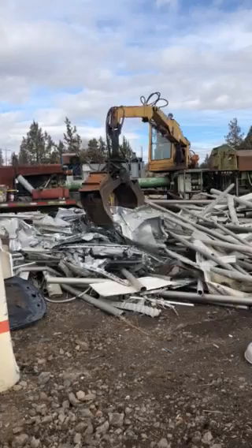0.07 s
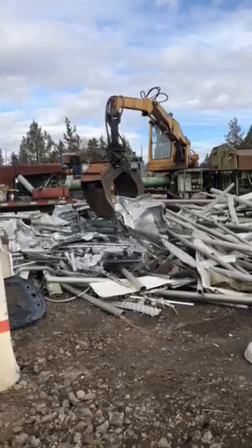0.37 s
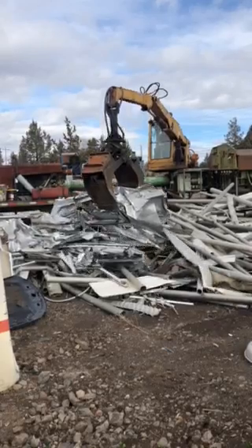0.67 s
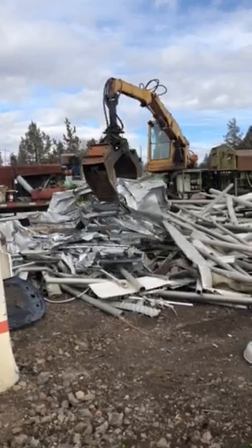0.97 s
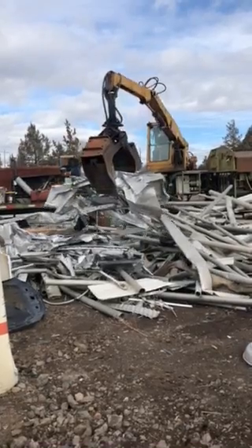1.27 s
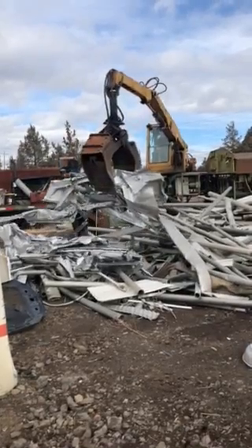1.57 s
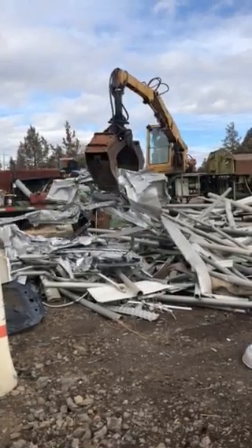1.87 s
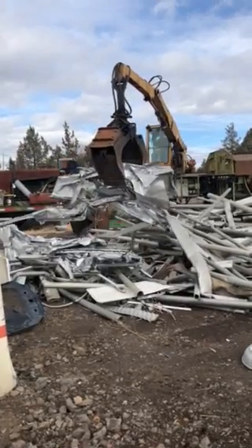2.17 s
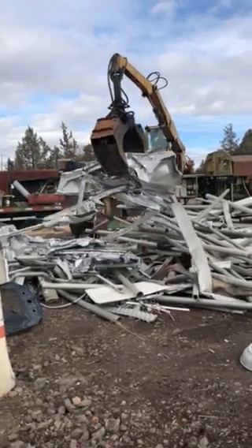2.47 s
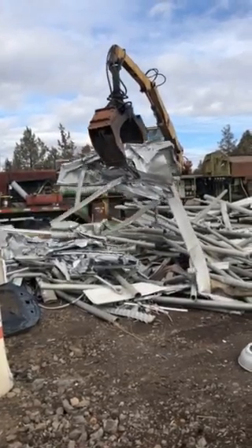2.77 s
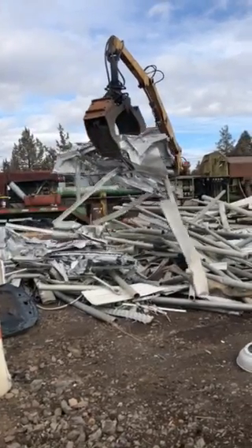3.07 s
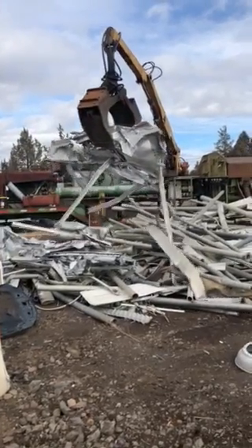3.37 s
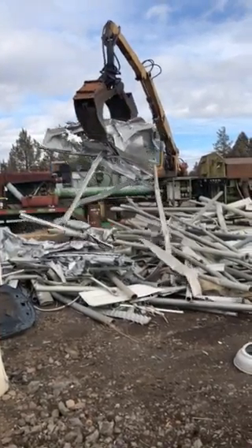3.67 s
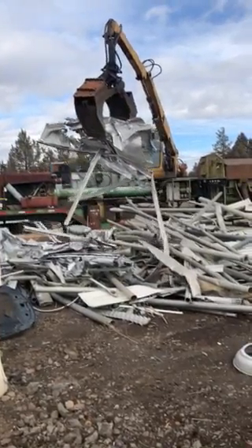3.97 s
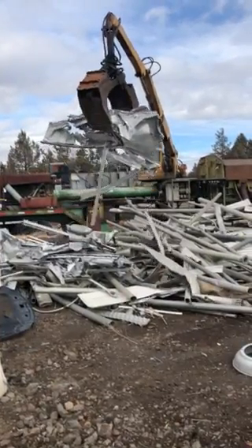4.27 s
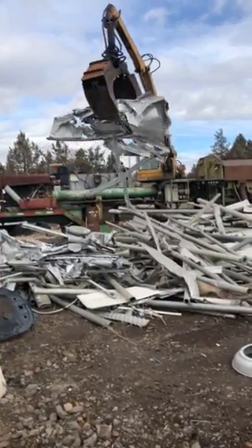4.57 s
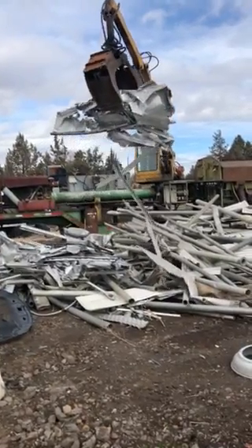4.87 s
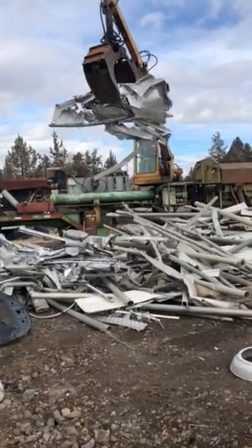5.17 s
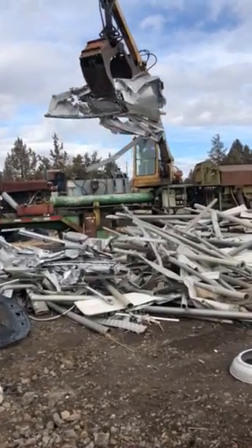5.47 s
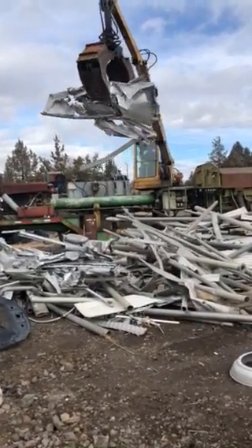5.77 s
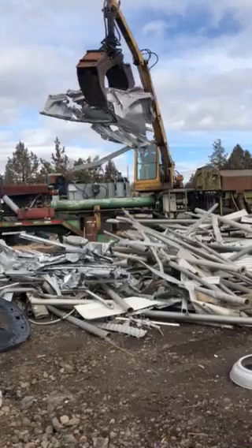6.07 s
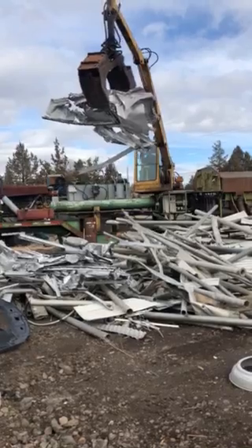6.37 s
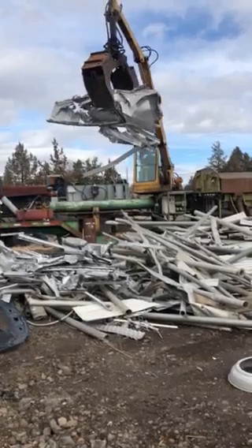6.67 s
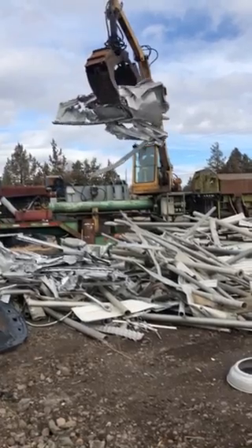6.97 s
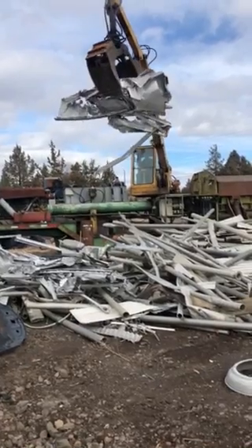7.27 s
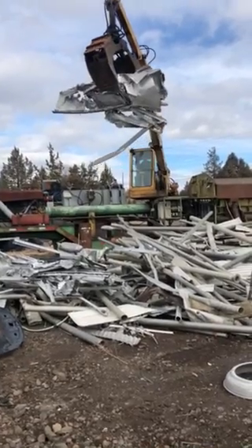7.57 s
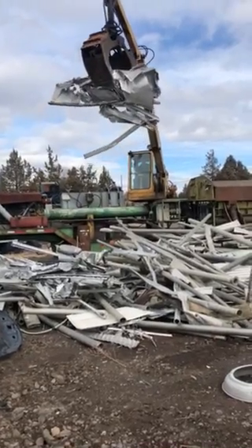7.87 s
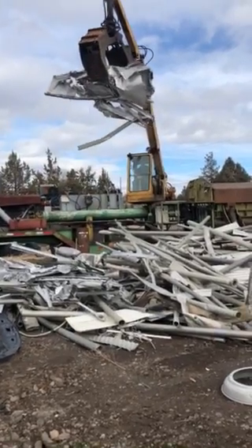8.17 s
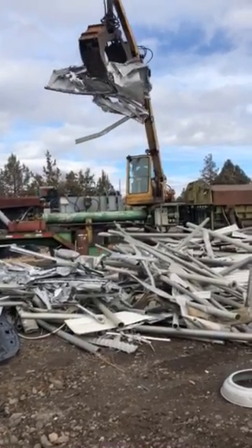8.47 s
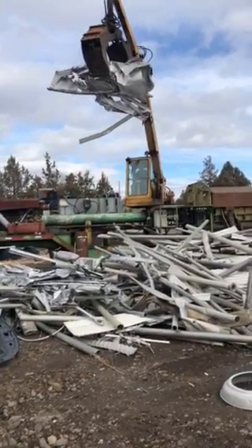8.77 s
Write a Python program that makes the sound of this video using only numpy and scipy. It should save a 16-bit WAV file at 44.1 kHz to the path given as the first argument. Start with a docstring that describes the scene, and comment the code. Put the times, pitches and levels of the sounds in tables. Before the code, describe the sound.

A diesel scrap handler runs throughout with a steady knocking drone and a rush of fan noise, heard through one microphone across an open yard. From the start, aluminium sheet and tubing is dragged off a pile in quick, uneven lurches. The sheets scrape, crinkle and boom as they flex, tubes clang with a short ring, and loose pieces rattle and thud as they land. At about 0.6 seconds an edge gives a brief, rough, falling squeal. Parts snap free at around 1.2 seconds and, most sharply, at 1.4. The scraping eases near 2 seconds, then the clatter returns thickly from 2.3 seconds, with more snaps and clangs near 3.4, 4.2 and 5.2. By about 5.5 seconds the metal noise dies away. The engine continues to the end near 9 seconds, slightly louder and working harder, with one faint rattle at around 7 seconds.

```python
"""An open scrap yard, one microphone across the yard from a diesel scrap handler.
The six-cylinder engine knocks and drones throughout, working harder as the boom rises.
The machine lifts a tangle of aluminium sheet and tubing off a pile: sheets scrape, boom and crinkle,
tubes clang, pieces snap loose and land, and one edge squeals through the jaws.
After five and a half seconds the load hangs free; one faint rattle follows over the engine."""
import sys
import numpy as np
from scipy import signal
from scipy.fft import rfft, irfft, next_fast_len
from scipy.io import wavfile
from scipy.ndimage import uniform_filter1d, minimum_filter1d

SR = 44100
rng = np.random.default_rng(int(sys.argv[2]) if len(sys.argv) > 2 else 0)


def log_audio(samples):
    """Write samples as a 16-bit WAV file to the path given in sys.argv[1]."""
    # one column per channel
    frames = np.atleast_2d(samples).T
    # limit to full scale, then quantise
    limited = np.clip(frames, -1, 1)
    pcm = np.round(limited * 32767).astype(np.int16)
    wavfile.write(sys.argv[1], SR, pcm)


N = 393372
TIME = np.arange(N) / SR
RING_TIME = TIME[:SR // 2]

# engine speed: t/s, crank rotation/Hz
CRANK_SPEED = [(0.0, 24.556), (0.5, 24.499), (1.0, 24.704), (1.6, 24.777), (2.2, 24.655), (3.3, 24.947),
               (4.3, 24.74), (5.0, 24.973), (6.0, 25.006), (6.5, 24.954), (7.1, 25.142), (7.6, 25.025),
               (8.3, 25.194), (8.92, 25.475)]
# how hard the engine works: t/s, knock level/dB, tone level/dB
ENGINE_LOAD = [(0, -26, -38), (1, -23.5, -43), (2.1, -30.5, -39.5), (3.1, -25, -35), (4.1, -25.5, -37),
               (5.8, -26.5, -36), (6.2, -23, -33.5), (7.2, -23, -33), (8.5, -24.5, -33.5),
               (8.92, -22.5, -35.5)]
# exhaust and gear tones: multiple of crank speed, relative level/dB
ENGINE_TONES = [(3, -0.5), (4, -15), (4.5, -9.5), (5, -11.5), (7, -10.5), (8, -15), (10, -17), (11, -13),
                (12, -19.5), (14, -14.5), (18, -13.5), (20, -10), (21, -11.5), (28, -13), (34, -4),
                (37, -7.5), (44, -5), (48.5, -7.5), (50, 1), (55, -4.5), (61, -6), (65, -0.5)]
# injector and valve knocks in one cycle of two turns: share of the cycle, level/dB, f/Hz
KNOCKS = [(.03, -0.5, 1450), (.06, -2, 1400), (.165, -5.5, 1400), (.26, -2, 1400), (.34, 2, 850),
          (.355, 2, 1450), (.40, 2, 800), (.48, 0.5, 850), (0.526, -2, 1370), (.595, -4.5, 1400),
          (.65, 0.5, 910), (.74, -3, 1250), (.86, 3, 1246), (.96, 1.5, 1050)]
# the load comes free in lurches, each a slide of metal over metal:
# t/s, length/s, scrape level/dB, sheet boom level/dB, grit level/dB, crinkle level/dB
SLIDES = [(0.074, 0.2, -20, -27, -36.5, -57), (0.228, 0.18, -18, -29.5, -35, -51),
          (0.415, 0.12, -20, -29, -42, -65), (0.618, 0.083, -17.5, -32.5, -38.5, -71),
          (0.753, 0.12, -19.5, -26.5, -39.5, -58), (0.89, 0.11, -20.5, -27, -38.5, -68),
          (1.12, 0.052, -16.5, -35, -37, -66), (1.2, 0.12, -14, -25.5, -40, -66),
          (1.362, 0.054, -19, -37, -38, -68), (1.443, 0.17, -18, -31, -39, -59),
          (1.632, 0.024, -14.5, -33, -34, -56), (1.75, .11, -24.5, -29, -52, -74),
          (1.931, 0.23, -30, -37, -63, -81), (2.261, .08, -15, -33, -35, -60),
          (2.34, 0.044, -16, -30.5, -25, -55), (2.423, 0.085, -16, -29, -27.5, -63),
          (2.516, 0.14, -21.5, -23, -45, -60), (2.626, 0.083, -18.5, -32, -34.5, -58),
          (2.748, .04, -25.5, -38, -56, -80), (2.777, 0.079, -14, -27.5, -36.5, -55),
          (2.885, .17, -19, -26.5, -44, -65), (3.157, 0.16, -18.5, -29.5, -45.5, -64),
          (3.31, 0.047, -19.5, -31, -41, -59), (3.368, 0.18, -15, -22.5, -40, -54),
          (3.568, .11, -16, -22, -41, -54), (3.749, 0.096, -15.5, -27, -38, -64),
          (3.919, 0.065, -20, -29.5, -39, -54), (4.08, 0.11, -25, -37, -56, -61),
          (4.22, 0.15, -18, -29, -42.5, -57), (4.415, 0.052, -18.5, -27, -45, -62),
          (4.628, .06, -21.5, -27.5, -48, -69), (4.723, 0.13, -31.5, -33, -57, -73),
          (4.955, 0.038, -13.5, -29, -32, -60), (5.04, 0.078, -19, -25.5, -52, -66),
          (5.179, 0.065, -13, -27, -42, -61), (5.242, 0.097, -14, -22.5, -36.5, -51),
          (5.364, 0.16, -29.5, -36, -45, -58)]
# tubes and sheets that ring on: t/s, level/dB, f/Hz, t60/s
CLANGS = [(.08, -19, 2190, 0.36), (0.081, -21, 3330, 0.22), (.28, -15, 696, 0.39), (.908, -11.5, 1433, .18),
          (1.195, -16, 1516, 0.098), (1.442, -15, 1513, 0.11), (1.65, -11.5, 1520, .09),
          (1.753, -18.5, 1500, 0.11), (1.753, -21, 2300, 0.083), (1.753, -28, 3520, .08),
          (2.429, -20, 3210, 0.43), (2.789, -15.5, 1453, .31), (2.81, -15.5, 671, .34),
          (3.389, -16.5, 1510, .2), (3.938, -14.5, 1480, 0.13), (4.216, -9.5, 1440, 0.12),
          (4.275, -15, 1493, 0.17), (4.642, -12.5, 2370, 0.068), (4.645, -23, 485, .18),
          (4.953, -12.5, 1446, .18), (5.18, -16, 1495, .15)]
# pieces coming loose and landing: t/s, rattle level/dB, thud level/dB, crack level/dB, rattle t60/s
HITS = [(0.15, -15.5, -42, -54, 0.11), (.2813, -10.5, -40, -37.5, 0.67), (0.4357, -14, -42, -32.5, .26),
        (.4594, -15, -36, -33, 0.46), (0.6316, -18.5, -44, -45, 0.96), (0.7578, -13.5, -34.5, -43, 0.45),
        (.9067, -11, -32, -40, 0.4), (0.9648, -15, -25.5, -43, 0.91), (1.1365, -15, -25, -39.5, 0.17),
        (1.1964, -8.5, -14.5, -29, .25), (1.372, -16.5, -41, -44, .25), (1.442, -8, -46, -31.5, 0.16),
        (1.4746, -15, -22.5, -55, 0.17), (1.521, -12.5, -29, -47, 0.22), (1.6524, -15.5, -27, -51, .25),
        (1.7528, -27, -25.5, -51, 0.35), (1.8964, -19.5, -26.5, -49, .3), (2.2188, -23, -25, -63, 0.33),
        (2.2572, -13.5, -13, -46, 0.24), (2.3056, -14.5, -33, -44, 0.62), (2.36, -16, -16, -33.5, 0.39),
        (2.4432, -6.5, -45, -38, 0.36), (2.6532, -16.5, -28, -50, 0.9), (2.7836, -14, -21, -40, 0.63),
        (2.973, -23.5, -19, -55.5, 0.63), (3.036, -18.5, -35, -50, .4), (3.1691, -21, -31.5, -52, .45),
        (3.261, -32, -19.5, -48, 0.098), (3.3931, -8.5, -27.5, -46, 0.29), (3.441, -28, -16.5, -50, 1),
        (3.589, -12, -39, -43, 0.61), (3.6507, -18.5, -16, -38.5, 1), (3.7597, -10, -33, -46, 0.23),
        (3.7891, -16, -40, -31, 0.16), (3.8291, -20.5, -35, -46, 0.48), (3.9232, -19.5, -40, -39.5, 0.28),
        (3.9854, -25.5, -41, -43, .28), (4.0738, -20.5, -36, -49, 0.24), (4.215, -19, -39, -36.5, 0.81),
        (4.424, -14, -28.5, -48, 0.29), (4.6387, -27.5, -21.5, -42.5, 0.64), (4.9549, -19.5, -44, -42, .5),
        (4.9734, -9.5, -39.5, -41, 0.29), (5.0429, -15.5, -31.5, -52.5, 0.4), (5.1797, -13, -28.5, -40, .3),
        (5.23, -14.5, -19, -45, 0.48), (7.052, -41, -55, -44.5, 0.13)]
# parts under tension breaking free: t/s, level/dB
BREAKS = [(1.197, -12), (1.442, -3), (1.753, -15.5), (3.388, -15.5), (4.215, -12.5), (4.953, -17),
          (5.179, -15)]
# a sheet edge sliding through the jaws: t/s, f/Hz, level/dB
SQUEAL = [(.605, 1583, -45), (.632, 1576, -9), (.654, 1549, -15.5), (.666, 1420, -20), (.70, 1409, -20.5),
          (.717, 1397, -19), (.735, 1380, -50)]

# the tone colour of each source: f/Hz, relative level/dB
BLOCK_SPECTRUM = [(60, -15.5), (120, -8), (270, -12), (400, -16), (500, -5.5), (850, -5), (1100, 0),
                  (1300, 8.5), (1650, 2), (2000, 0), (2550, -0.5), (3300, -18), (4500, -41), (12000, -71.5)]  # engine block
FAN_SPECTRUM = [(25, -37.5), (50, -11), (80, -4.5), (140, -10), (220, -10), (400, -9), (800, 1),
                (1400, -0.5), (2500, -4), (3200, -10.5), (4050, -24.5), (4400, -22.5), (6200, -28.5),
                (7800, -42.5), (9600, -41.5), (12000, -50), (15500, -47.5)]  # fan rush
SCRAP_SPECTRUM = [(200, -29.5), (400, -9), (650, 0), (1000, 0.5), (1500, 0), (2000, -2), (2600, -3.5),
                  (3400, -15.5), (4200, -34.5), (7000, -47), (14000, -85)]  # metal scraping and clattering
BOOM_SPECTRUM = [(60, -47), (120, -18), (170, 1.5), (250, 2.5), (450, -3.5), (800, -17), (1600, -62),
                 (8000, -80.5)]  # flexing sheets
GRIT_SPECTRUM = [(1500, -35), (3200, 11.5), (5000, 7), (6500, -6), (8500, -14.5), (12000, -25),
                 (15500, -31)]  # gritty top of a slide
FOIL_SPECTRUM = [(3000, -20), (6000, 0.5), (9000, 2.5), (12000, -3.5), (15500, -2)]  # thin edges buckling
THUD_SPECTRUM = [(100, -20.5), (200, -10), (450, 5.5), (750, 7.5), (1300, 4.5), (3000, -60), (10000, -73)]  # body of a blow
CRACK_SPECTRUM = [(1500, -9), (3500, -2), (5300, 5), (8000, -5), (12000, -12.5), (15500, -18)]  # bright edge of a blow
SNAP_SPECTRUM = [(500, -8.5), (1400, 5.5), (2600, 4), (4000, -6.5), (6000, -20.5), (12000, -35.5)]  # parts breaking free
# the microphone port, two resonances with a notch between: f/Hz, level/dB
MIC_PORT = [(1130, -1.5), (1280, -1), (1420, 5), (1540, 6.5), (1630, -0.5), (1690, -4), (1780, -12.5),
            (1980, -6.5), (2280, -1.5), (2550, 2.5), (2850, -4), (3300, -4.5)]


def from_db(db):
    """Decibels to gain."""
    return 10 ** (np.asarray(db) / 20)


def rms_one(x):
    """Scale to unit rms."""
    return x / np.sqrt(np.mean(x ** 2) + 1e-20)


def energy_one(x):
    """Scale to unit energy."""
    return x / np.linalg.norm(x)


def in_time(rows):
    """One value per sample for each column of a curve."""
    times, *columns = np.transpose(rows)
    return [np.interp(TIME, times, column) for column in columns]


def drift(rate_hz):
    """A random wander with a spread of about 1."""
    steps = rng.standard_normal(8192)
    return np.interp(TIME * rate_hz, np.arange(len(steps)), steps)


def colour(x, spectrum, keep_power=True):
    """Minimum-phase filter with the given spectrum; by default white noise keeps its power."""
    size = 2 * next_fast_len(len(x) // 2 + 4096)
    hz, db = np.transpose(spectrum)
    bin_hz = np.arange(size // 2 + 1) * SR / size
    gain = from_db(np.interp(np.log(bin_hz + 1), np.log(hz), db))
    cepstrum = irfft(np.log(rms_one(gain) if keep_power else gain))
    cepstrum[1:size // 2] *= 2  # folding the cepstrum makes the filter causal
    cepstrum[size // 2 + 1:] = 0
    return irfft(rfft(x, size) * np.exp(rfft(cepstrum)))[:len(x)]


def add(track, start_s, sound):
    """Mix a sound into the track."""
    at = max(int(start_s * SR), 0)
    track[at:at + len(sound)] += sound[:N - at]


def fade(t60):
    """Half a second of exponential decay, 60 dB down after t60 seconds."""
    return np.exp(-np.log(1000) * RING_TIME / t60)


def burst(t60):
    """Half a second of dying noise."""
    return rng.standard_normal(SR // 2) * fade(t60)


def dense_ring(t60):
    """Very many modes dying together; unit energy."""
    return energy_one(burst(t60))


def engine(fan_db=-3):
    """Exhaust and gear tones and knocks follow the crank; the fan's rush swells with the knocks."""
    crank_hz, = in_time(CRANK_SPEED)
    knock_db, tone_db = in_time(ENGINE_LOAD)
    turns = np.cumsum(crank_hz) / SR
    tones = np.zeros(N)
    for order, db in ENGINE_TONES:
        gain = from_db(db + 0.5 * drift(rate_hz=6.3))
        tones += gain * np.sqrt(2) * np.sin(2 * np.pi * (order * turns + rng.random()))
    knocks = knocking(turns)
    fan = rms_one(colour(rng.standard_normal(N), FAN_SPECTRUM))
    return from_db(tone_db) * tones + from_db(knock_db) * (knocks + from_db(fan_db) * fan)


def knocking(turns, uneven_db=1.3):
    """Each injector and valve rings the block in its own way, once a cycle, with uneven strength."""
    out = np.zeros(N)
    for share, db, hz in KNOCKS:
        starts = np.flatnonzero(np.diff(np.floor(turns / 2 - share)) > 0) / SR
        tick = energy_one(np.sin(2 * np.pi * hz * RING_TIME) * fade(t60=0.0055))
        ring = from_db(-9) * dense_ring(t60=0.04)
        scatter = from_db(-3.5) * dense_ring(t60=0.16)
        knock = (tick / 4 + ring + scatter)[:SR // 5]
        for start, chance in zip(starts, rng.standard_normal(200)):
            add(out, start, from_db(db + uneven_db * chance) * knock)
    return rms_one(colour(out, BLOCK_SPECTRUM))


def grains(per_s, spread_db, size):
    """Random small contacts of uneven strength; rms 1."""
    strength = from_db(spread_db * np.minimum(rng.exponential(1, size), 4))
    sign = rng.choice([-1, 1], size)
    touching = rng.random(size) < per_s / SR
    return rms_one(strength * sign * touching)


def crunch(per_s, spread_db, t60):
    """Many small contacts, each a short burst of noise; rms 1."""
    contacts = grains(per_s, spread_db, size=N)
    power_decay = from_db(-120 / (t60 * SR))
    power = signal.lfilter([1], [1, -power_decay], contacts ** 2 + 1e-12)
    return rms_one(np.sqrt(power) * rng.standard_normal(N))


def sheet_ring(t60, modes):
    """One piece of thin aluminium with scattered modes of its own; unit energy."""
    hz = rng.uniform(300, 6000, modes)
    spectrum = np.zeros(SR // 4 + 1, complex)
    bins = (hz / 2).astype(int)  # 2 Hz apart
    spectrum[bins] = rng.standard_normal(modes) * np.exp(2j * np.pi * rng.random(modes))
    return energy_one(irfft(spectrum, SR // 2) * fade(t60))


def pings(per_s, low_hz, high_hz, t60, spread_db):
    """Small offcuts and edges, each ringing briefly on a pitch of its own; rms 1."""
    out, size = np.zeros(N), SR // 12
    decay = fade(t60)[:size]
    for when, pitch, strength in rng.random((int(per_s * N / SR), 3)):
        hz = low_hz * (high_hz / low_hz) ** pitch
        ping = np.sin(2 * np.pi * hz * TIME[:size]) * decay
        add(out, when * N / SR, from_db(spread_db * strength) * ping)
    return rms_one(out)


def sliding(texture, spectrum, levels_db, attack_s, release_t60, lag_s=0, sag_db_per_s=10):
    """A coloured texture swells with each slide, sags as friction slows it and dies once it stops."""
    t, power = TIME[::32], 0
    for (start, length, *_), db in zip(SLIDES, levels_db):
        age = np.maximum(t - start - lag_s, 0)
        swell = np.minimum(age / attack_s, 1)
        dying = np.exp(-np.log(1000) * np.maximum(age - length, 0) / release_t60)
        power += (swell * from_db(db - sag_db_per_s * age) * dying) ** 2
    return np.interp(TIME, t, np.sqrt(power)) * rms_one(colour(texture, spectrum))


def dragging():
    """Stick and slip: dense small contacts ring one sheet after another; sheets boom as they flex."""
    _, _, scrape_db, boom_db, grit_db, _ = np.transpose(SLIDES)
    slips = crunch(per_s=500, spread_db=0.5, t60=0.017)
    sheets, step = slips.copy(), SR // 10
    for at in range(0, N, step):
        ring = signal.fftconvolve(slips[at:at + step], sheet_ring(t60=0.2, modes=130))
        add(sheets, at / SR, from_db(-9) * ring)
    specks = crunch(per_s=160, spread_db=3.5, t60=0.11)
    specks += from_db(-14.5) * pings(per_s=110, low_hz=3180, high_hz=7030, t60=0.074, spread_db=12.5)
    scrape = sliding(sheets, SCRAP_SPECTRUM, scrape_db, attack_s=0.011, release_t60=0.29)
    boom = sliding(sheets, BOOM_SPECTRUM, boom_db, attack_s=0.016, release_t60=0.65, lag_s=0.011)
    grit = sliding(specks, GRIT_SPECTRUM, grit_db, attack_s=0.011, release_t60=0.17)
    return scrape + boom + grit


def crinkling():
    """Thin edges buckle during each slide in a fine, bright crackle."""
    *_, crinkle_db = np.transpose(SLIDES)
    crackle = crunch(per_s=250, spread_db=0.3, t60=0.03)
    crackle += from_db(-11.5) * pings(per_s=120, low_hz=6000, high_hz=15000, t60=0.045, spread_db=11.5)
    return sliding(crackle, FOIL_SPECTRUM, crinkle_db, attack_s=0.012, release_t60=0.3)


def clangs(mode_split=0.037, attack_s=0.0016):
    """A bent tube rings in a cluster of three close modes that beat."""
    out = np.zeros(N)
    attack = np.minimum(RING_TIME / attack_s, 1)
    for start, db, hz, t60 in CLANGS:
        mode_hz = hz * (1 + mode_split * np.array([0, -1, 1]) * rng.uniform(0.5, 1.3, size=3))
        ring = np.array([1, 0.5, 0.5]) @ np.sin(2 * np.pi * mode_hz[:, None] * RING_TIME)
        add(out, start, from_db(db) * ring * fade(t60) * attack)
    return out


def hits():
    """Each blow cracks, thuds and rattles on against the same piece; parts under tension snap free."""
    clatter, thuds, cracks, snaps = np.zeros((4, N))
    for start, rattle_db, thud_db, crack_db, t60 in HITS:
        rattle = grains(per_s=4400, spread_db=2.5, size=SR // 2) * fade(t60)
        contact = burst(t60=0.044) + from_db(-5) * rattle
        piece = signal.fftconvolve(contact, sheet_ring(t60=0.14, modes=60))[:SR // 2]
        crack = rng.standard_normal(SR // 2) * (fade(t60=0.087) + from_db(-10.5) * fade(t60))
        add(clatter, start, from_db(rattle_db) * (contact + from_db(-8) * piece))
        add(thuds, start, from_db(thud_db) * rattle)
        add(cracks, start, from_db(crack_db) * crack)
    for start, db in BREAKS:
        add(snaps, start, from_db(db) * burst(t60=0.045))
    return (colour(clatter, SCRAP_SPECTRUM) + colour(thuds, THUD_SPECTRUM)
            + colour(cracks, CRACK_SPECTRUM) + colour(snaps, SNAP_SPECTRUM))


def squeal(waver=0.03, rough_db=3.5):
    """Friction catches a sheet edge in the jaws on one rough, falling note."""
    hz, db = in_time(SQUEAL)
    rubbing = (TIME > SQUEAL[0][0]) & (TIME < SQUEAL[-1][0])
    phase = 2 * np.pi * np.cumsum(hz * (1 + waver * drift(rate_hz=380))) / SR
    gain = from_db(db + rough_db * drift(rate_hz=200))
    return rubbing * gain * np.sqrt(2) * np.sin(phase)


def pile_scatter(x, t60=0.81, wet_db=-11):
    """Sound scatters among the heaped metal and reaches the microphone with a short tail."""
    return x + from_db(wet_db) * signal.fftconvolve(x, dense_ring(t60))[:N]


def scene():
    """Engine and scrap in mono, heard from across the yard."""
    screech = squeal()
    metal = dragging() + crinkling() + pile_scatter(hits() + clangs() + screech)
    return (engine() + metal)[None]


def record(dry, ceiling=0.76, bass_cut_hz=45, top_cut_hz=15850, fade_s=0.004):
    """Microphone colour and bass roll-off, a fast limiter, a closing fade and a steep top cut."""
    bass_cut = signal.butter(2, bass_cut_hz, "high", fs=SR, output="sos")
    top_cut = signal.ellip(12, 0.1, 90, top_cut_hz, fs=SR, output="sos")
    mic = signal.sosfilt(bass_cut, colour(dry[0], MIC_PORT, keep_power=False))
    window = SR // 100
    safe_gain = np.minimum(1, ceiling / (np.abs(mic) + 1e-9))
    limiter = uniform_filter1d(minimum_filter1d(safe_gain, window), window)
    fade_out = np.minimum(1, (TIME[-1] - TIME) / fade_s)
    return signal.sosfilt(top_cut, mic * limiter * fade_out)[None]


dry = scene()
out = record(dry)
log_audio(out)
```